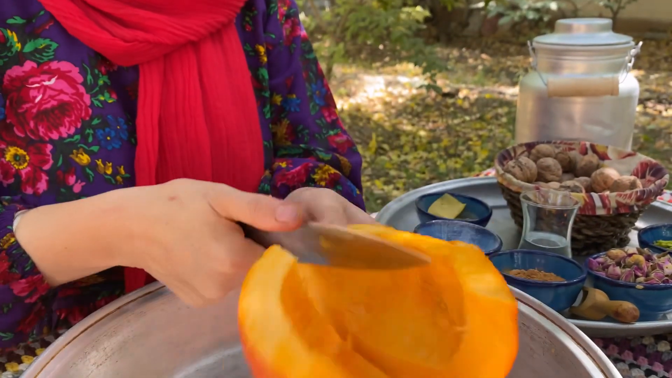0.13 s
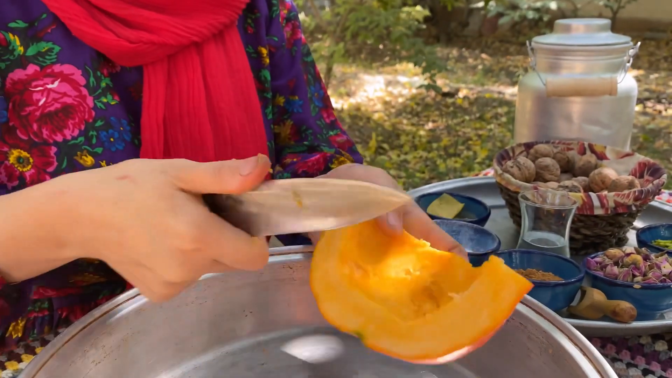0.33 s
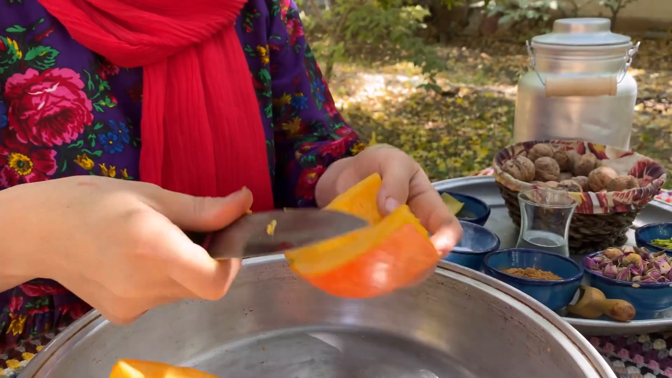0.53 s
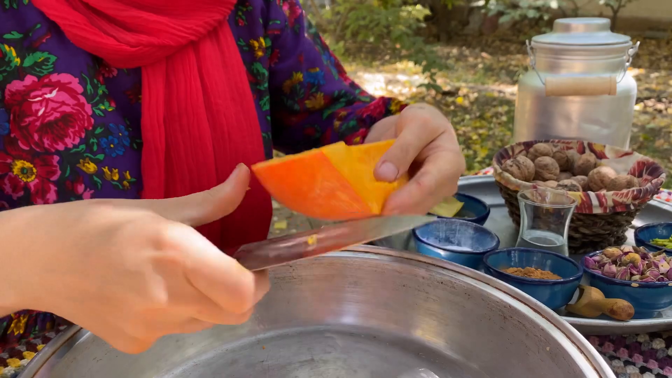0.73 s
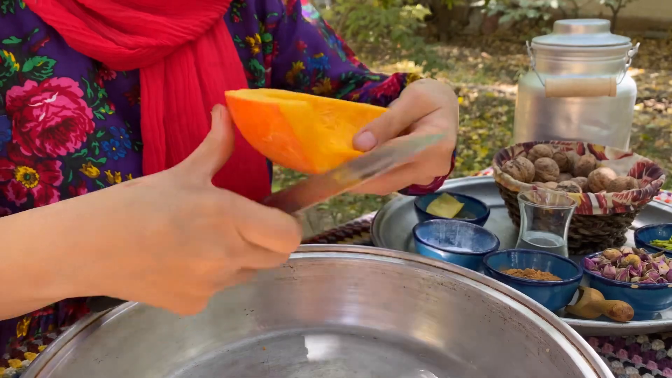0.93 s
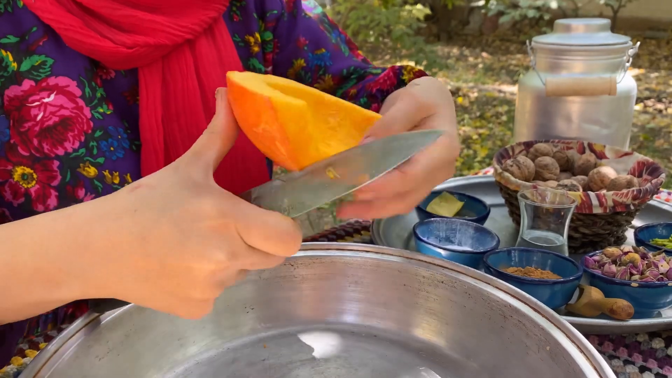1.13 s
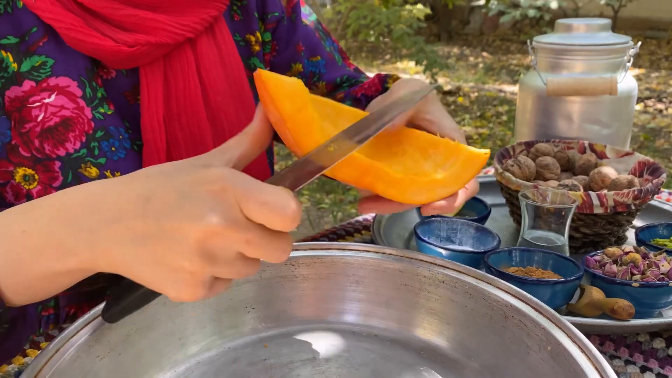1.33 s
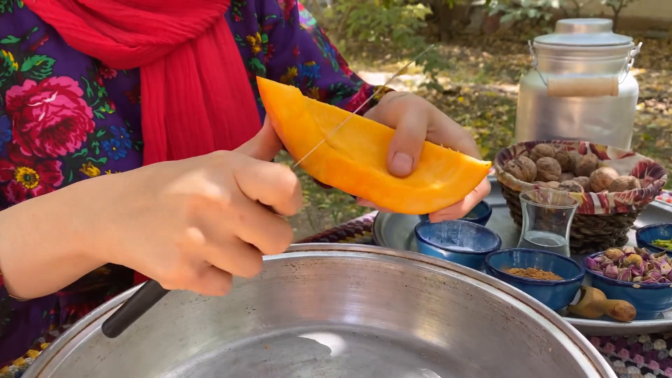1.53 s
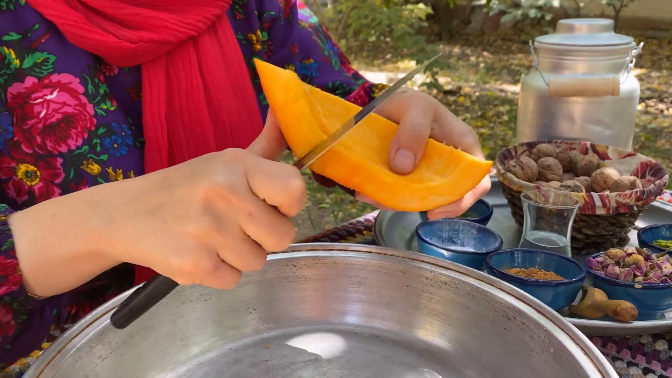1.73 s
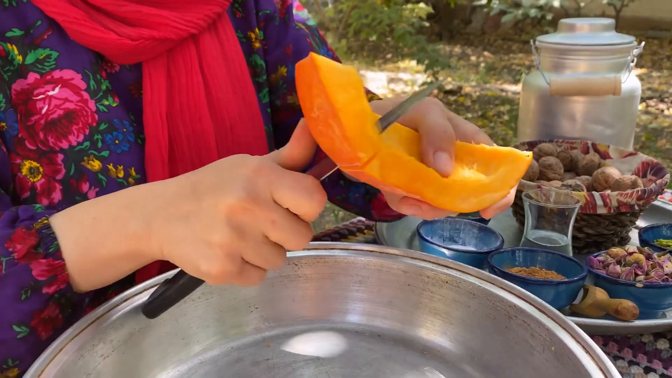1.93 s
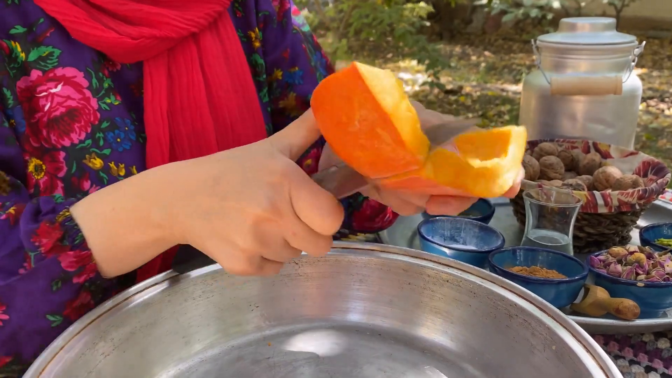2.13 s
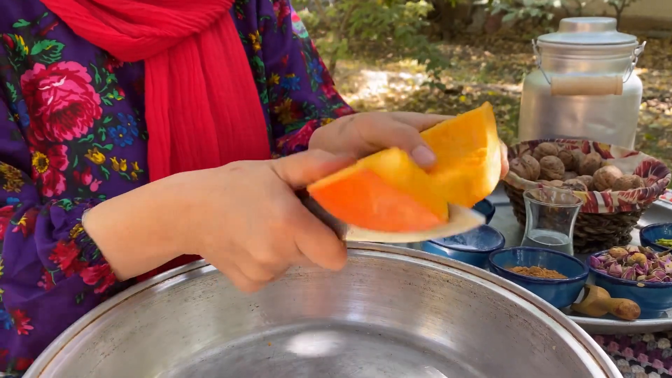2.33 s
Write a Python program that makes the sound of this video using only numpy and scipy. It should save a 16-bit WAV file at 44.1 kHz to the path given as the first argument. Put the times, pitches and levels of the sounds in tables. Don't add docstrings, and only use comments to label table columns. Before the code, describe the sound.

A knife cuts raw pumpkin, close and dry outdoors in faint wind and soft hiss. Short rasps until 0.1 s; at 0.19 s a half drops loudly into a metal basin, with low table thumps and softening knocks to 0.7. Double rim tap at 0.76-0.79, then near quiet, a tiny click at 1.48. Crisp slicing from 1.7, sharp snap 1.91, crackling break 2.04-2.07, faint last slice 2.33.

```python
import sys
import numpy as np
from scipy import signal
from scipy.fft import rfft, irfft
from scipy.io import wavfile
from scipy.ndimage import uniform_filter1d

SR = 44100
rng = np.random.default_rng(int(sys.argv[2]) if len(sys.argv) > 2 else 0)


def gain_from_db(level_db):
    decades = np.asarray(level_db, float) / 20
    return 10 ** decades


def digitize_waveform(pressure):
    field = np.atleast_2d(pressure).T
    bounded = np.clip(field, -1, 1)
    quanta = np.round(bounded * 32767).astype(np.int16)
    wavfile.write(sys.argv[1], SR, quanta)


N = 103635
SIDES = np.array([[1], [-1]])


def colour(x, points, tilt_db=0.):
    hz = np.maximum(np.fft.rfftfreq(x.shape[-1], 1 / SR), 10)
    points_hz, points_db = np.array(points, float).T
    gain_db = np.interp(np.log(hz), np.log(points_hz), points_db)
    gain_db = gain_db + tilt_db * np.log2(np.maximum(hz, 500) / 2000)
    return irfft(rfft(x) * gain_from_db(gain_db), x.shape[-1])


def unit(x):
    return x / np.sqrt(np.mean(x ** 2))


def add(out, x, at_s):
    i = int(at_s * SR)
    out[:, i:i + x.shape[1]] += x[:, :N - i]


def pan(pan_db):
    return SIDES * pan_db / 2


def walk(rate_per_s):
    k = int(SR / rate_per_s)
    steps = np.repeat(rng.standard_normal(N // k + 1), k)
    return unit(uniform_filter1d(uniform_filter1d(steps, k), k)[:N])


def garden():
    # f/Hz, density/dB per Hz
    air_spectrum = [(15, -49), (35, -7.5), (65, -6.5), (119, -10.5), (319, -17), (353, -28), (550, -28.5),
                    (1300, -34), (2300, -35.5), (4500, -40.5), (10000, -54.5), (16100, -81), (22000, -120)]
    level_db, flicker_db, flicker_per_s = -53, .8, 12
    out = 0
    for hz in 35 * 2. ** np.arange(9):
        mid, side = rng.standard_normal((2, N))
        band = [(hz / 8, -60), (hz / 2, -9), (hz, 0), (hz * 2, -9), (hz * 8, -60)]
        air = mid + min(0.51 + hz / 2500, 1) * side * SIDES
        flicker = gain_from_db(flicker_db * (-0.5 + 100 / hz) * walk(flicker_per_s))
        out = out + colour(air, band) * flicker
    return gain_from_db(level_db) * unit(colour(out, air_spectrum))


def table_shake():
    # highest crest t/s, peak level/dB, f/Hz
    thumps = [(0.221, -11.5, 79.64), (0.29, -12, 77.6), (0.349, -29.5, 75), (0.418, -29, 73.6),
              (0.475, -24.5, 72.8), (0.496, -22.5, 78.7), (.532, -34.5, 72.9), (0.587, -39, 66.7),
              (.663, -29, 83.1), (0.703, -35, 82.4), (0.77, -31, 77.5), (0.78, -24, 83),
              (0.806, -31.5, 77.4), (0.834, -34, 69.3), (.873, -38, 62.7), (0.973, -34, 73),
              (1.05, -48, 60), (1.152, -37, 74.4), (1.21, -42.5, 64.2), (1.232, -41.5, 73.5),
              (1.305, -44, 61.6), (1.322, -39.5, 60), (1.445, -51.5, 60), (1.6, -49.5, 75.7),
              (1.637, -42.5, 75.8), (1.756, -48.5, 71.3), (1.935, -43, 76.2), (1.978, -44.5, 66.24),
              (2.131, -47, 60), (2.219, -46, 55), (2.331, -48, 60)]
    sharp_s, fall_s, sag, overtone_db, pan_db = 0.011, 0.007, 0.36, -11, -4.5
    out, t = np.zeros((2, N)), np.arange(-2200, 7000) / SR
    for at_s, db, hz in thumps:
        swell = np.exp(-((t - .004) / sharp_s) ** 2 / 2)
        swell += gain_from_db(-22) * np.exp(-t / fall_s) * np.clip(t / sharp_s, 0, 1)
        phase = 2 * np.pi * hz * (t - sag * sharp_s * np.log(np.cosh(t / sharp_s)))
        early = np.exp(-((t + 0.012) / 0.0055) ** 2) * np.sin(2.22 * 2 * np.pi * hz * t)
        thump = swell * np.cos(phase) + gain_from_db(overtone_db) * early
        add(out, gain_from_db(db + pan(pan_db)) * thump, at_s + t[0])
    return out


def rasp(rows, edge_s, grit_db, ring_db, ring_hz, apart, pan_db):
    # f/Hz, density/dB per Hz
    flesh = [(180, -54), (300, -25.5), (1150, -11.5), (1530, -9), (3000, -12), (7260, -9.5), (11600, -16),
             (13500, -23), (15400, -20.5), (16500, -54)]
    crackle_per_s = 1800
    out, t = np.zeros((2, N)), np.arange(12000) / SR - edge_s
    for start_s, length_s, db, tilt_db in rows:
        mid, side, grit, mottle = rng.standard_normal((4, len(t)))
        size = gain_from_db(grit_db * unit(uniform_filter1d(grit, 1 + int(SR / crackle_per_s))))
        ripple = gain_from_db(ring_db * unit(uniform_filter1d(mottle, 1 + int(ring_hz * len(t) / SR))))
        ripple = ripple[:len(t) // 2 + 1]
        grains = irfft(ripple * rfft(size * (mid + apart * side * SIDES)))
        gate = np.clip(t / edge_s + 1, 0, 1) ** 2 * np.exp(-np.maximum(t - length_s, 0) / edge_s)
        burst = unit(colour(grains, flesh, tilt_db)) * gate
        add(out, gain_from_db(db + pan(pan_db)) * burst, max(start_s - edge_s, 0))
    return out


def hits(rows, modes, scatter_db, crack_db, crack_s, lag_s, pan_db):
    wander_rad = .0025
    crack_spectrum = [(250, -21.5), (550, 2), (900, 1), (7500, -22.5), (9000, -33.5), (13000, -72)]
    out, t = np.zeros((2, N)), np.arange(13000) / SR
    hz, mode_db, t60_s = (c[:, None] for c in np.array(modes).T)
    for at_s, db, tilt_db, contact_s in rows:
        level_luck, pan_luck = rng.standard_normal((2, len(hz), 1))
        noise = rng.standard_normal((2, len(t)))
        steps = rng.standard_normal((len(hz), len(t)))
        wander = wander_rad * np.sqrt(hz / 100) * np.cumsum(steps, axis=1)
        ring_db = mode_db + tilt_db * np.log2(hz / 1000) + scatter_db * level_luck
        ring = gain_from_db(ring_db) * np.exp(-np.log(1000) * t / np.clip(t60_s, .01, .3))
        body = []
        for side in (1, -1):
            gain = gain_from_db(side * (1.1 * pan_luck + pan_db / 2))
            wave = np.sin(2 * np.pi * hz * (t - side * lag_s / 2) + wander)
            body.append((ring * gain * wave).sum(0))
        body = np.array(body) * (1 - np.exp(-(t / max(contact_s, 1e-4)) ** 2))
        crack = unit(colour(noise * 0.61 + noise[1], crack_spectrum, tilt_db))
        crack = crack * np.clip(t / 0.0005, 0, 1) ** 2 * np.exp(-t / crack_s)
        add(out, gain_from_db(db) * (body / np.abs(body).max() + gain_from_db(crack_db) * crack), at_s)
    return out


def basin_booms():
    # t/s, peak level/dB, brightness/dB per octave, contact/s
    booms = [
        (.19, -16.5, 0, 0.0055),
        (.275, -23, 0.0059, .008),
        (.47, -28, 0.023, 0.013),
        (.755, -26.5, 0.0047, 0.0071),
        (.79, -26.5, 0, 0.0066),
    ]
    # f/Hz, level/dB, t60/s
    belly = [(144, 0, 0.0786), (172.2, -2, .1)]
    return hits(booms, belly, 0, crack_db=-59.5, crack_s=0.0041, lag_s=0, pan_db=-3.0)


def nail_clicks():
    # t/s, peak level/dB, brightness/dB per octave, contact/s
    clicks = [
        (.415, -46.5, 0.011, 0.0031),
        (1.394, -49, 0.0023, .003),
        (1.476, -37, 0, 0.0007),
    ]
    # f/Hz, level/dB, t60/s
    nail = [(2320, -6, 0.016), (2405, -6, 0.026), (3260, -3.5, 0.0094)]
    return hits(clicks, nail, scatter_db=-3.0, crack_db=-30.5, crack_s=0.0035, lag_s=.0001, pan_db=-2.0)


def rind_slides():
    # start t/s, length/s, level/dB, brightness/dB per octave
    slides = [
        (.35, 0.099, -52, -3.5),
        (.752, 0.062, -57, -6.5),
        (.83, 0.028, -55, -10),
        (.95, 0.23, -64.5, -8.5),
        (2.015, 0.049, -44, -8.5),
        (1.57, 0.14, -68, -5),
    ]
    return rasp(slides, edge_s=0.026, grit_db=5.0, ring_db=7.0, ring_hz=60, apart=0.74, pan_db=0.0)


def fibre_ticks():
    # start t/s, length/s, level/dB, brightness/dB per octave
    ticks = [(.307, 0.0081, -43, -8), (1.281, 0.0054, -54.5, -6), (1.298, .004, -52.5, -9),
             (1.395, 0.02, -61.5, -6), (1.476, 0.0028, -55.5, -3.5), (1.8912, .001, -42.5, -4.5),
             (1.948, 0.0012, -37.5, -1)]
    return rasp(ticks, edge_s=.0015, grit_db=0, ring_db=3, ring_hz=400, apart=.7, pan_db=0)


def half_lands():
    # t/s, peak level/dB, brightness/dB per octave, contact/s
    landing = [
        (.1863, -1, 0, .0022),
        (.2015, -18, 1, .003),
    ]
    # f/Hz, level/dB, t60/s
    shell = [(648, -4, .052), (705, -19, .085), (855, 0, .032), (960, -3, .028), (1097, -9, .1),
             (1357, -29, .13), (1500, -16, .04), (1727, -27, .11), (2150, -25, .05), (2815, -28, .07),
             (3020, -30, .09), (5600, -31, .03), (4495, -33, .055), (6990, -30, .04)]
    return hits(landing, shell, 0, crack_db=-21, crack_s=0.01, lag_s=.00006, pan_db=1)


def half_rocks():
    # t/s, peak level/dB, brightness/dB per octave, contact/s
    rocks = [(0.269, -19.5, -0.5, 0.0018), (.281, -32.5, -9, 0.0017), (.297, -35.5, 3.5, .003),
             (0.395, -35, -3, 0.00185), (0.456, -35, -3.3, 0.001), (0.478, -28.5, -4, 0.00062),
             (0.644, -33, -8.5, 0.0021), (0.683, -41, -4, 0.00094), (0.84, -40.5, -6, 0.0035),
             (0.955, -45, -8, 0.00067), (1.188, -44.5, -4.5, 0.0015)]
    # f/Hz, level/dB, t60/s
    hollow = [(473, 0, .04), (700, -4, .05), (820, -11, .11), (860, -3, .04), (1097, -13, .12),
              (1351, -16, .12), (1491, -19, .1), (1727, -21, .1), (2230, -19, .08), (2500, -22, .06),
              (3042, -24, .09)]
    return hits(rocks, hollow, scatter_db=2.5, crack_db=-14.5, crack_s=0.013, lag_s=.0001, pan_db=-0.5)


def rim_taps():
    # t/s, peak level/dB, brightness/dB per octave, contact/s
    taps = [
        (.7645, -15.5, 2, 0.0029),
        (.787, -13, 2, 0.0011),
        (.81, -40, 3, 0.0018),
        (.862, -41, 7.5, 0.0077),
        (.875, -48.5, -9, 0.002),
    ]
    # f/Hz, level/dB, t60/s
    rim = [(468, 3, .05), (755, -7, .05), (1110, -3, .13), (1453, -14, .1), (1795, -15, .08),
           (2190, -4, .05), (2235, -2, .08), (2503, -11, .11), (2995, -11, .1), (3607, -8, .06),
           (4200, -5, .055), (4300, -9, .035), (4900, -11, .05), (7391, -30, .063)]
    return hits(taps, rim, scatter_db=1, crack_db=-19.5, crack_s=0.01, lag_s=.0001, pan_db=-5.0)


def blade_rubs():
    # t/s, peak level/dB, brightness/dB per octave, contact/s
    rubs = [
        (2.0, -52, 9, .006),
        (2.012, -52, 3.5, 0.0072),
        (2.024, -40, -10, .004),
        (2.033, -25.5, -2, 0.0024),
    ]
    # f/Hz, level/dB, t60/s
    blade = [(700, -3, .04), (1097, -3, .05), (1300, -5, .04), (1600, -2, .06), (2500, -11, .04),
             (3200, -10, .04), (5300, -18, .03)]
    return hits(rubs, blade, scatter_db=2, crack_db=-18, crack_s=.01, lag_s=-.0002, pan_db=0.5)


def flesh_snaps():
    # t/s, peak level/dB, brightness/dB per octave, contact/s
    snap = [
        (1.9115, -9.5, 0, .0015),
    ]
    # f/Hz, level/dB, t60/s
    wedge = [(445, -12, .05), (525, -17, .08), (700, -14, .04), (972, 0, .045), (1217, -3, .045),
             (1475, -3, .045), (1733, -14, .08), (2020, -10, .06), (2604, -14, .08), (2850, -16, .055)]
    return hits(snap, wedge, 0, crack_db=-13.0, crack_s=0.008, lag_s=-0.000097, pan_db=-0.5)


def piece_breaks():
    # t/s, peak level/dB, brightness/dB per octave, contact/s
    breaks = [
        (2.0412, -18, 0, .0015),
        (2.0478, -21, 1, .0015),
        (2.0566, -8.5, 1, .001),
        (2.066, -17, -1, .002),
    ]
    # f/Hz, level/dB, t60/s
    piece = [(446, -10, .07), (540, -11, .05), (665, -1, .045), (950, -15, .14), (1097, -6, .105),
             (1280, -10, .07), (1450, -11, .06), (1600, -10, .04), (1725, -18, .1), (5150, -23, .025),
             (2550, -23, .09), (2985, -16, .065), (4202, -26, .07), (5324, -32, .12)]
    return hits(breaks, piece, scatter_db=1.5, crack_db=-15, crack_s=0.0075, lag_s=-0.00023, pan_db=0.0)


def blade_slices():
    # start t/s, length/s, level/dB, brightness/dB per octave
    slices = [(.023, 0.0063, -40.5, -5.5), (.028, 0.012, -41.5, -1.5), (.06, 0.017, -32.5, -3),
              (.082, 0.01, -40.5, -4.5), (1.708, 0.018, -57, -1), (1.753, 0.0085, -43.5, 0.5),
              (1.762, 0.0096, -48.5, -3.5), (1.796, 0.0059, -42.5, 2.5), (1.802, 0.0057, -40.5, -0.5),
              (1.8145, 0.0024, -45, -3), (1.829, 0.016, -43, 0.7), (1.845, 0.019, -40, -0.4),
              (1.872, 0.0042, -41, 0.5), (1.882, 0.013, -40.5, 0), (1.9, 0.0097, -48.5, -1),
              (2.326, 0.011, -47, 0)]
    return rasp(slices, edge_s=0.0022, grit_db=1, ring_db=3.5, ring_hz=102.5, apart=0.79, pan_db=1.0)


def yard(near):
    t60_s, level_db = .16, -18
    t = np.arange(15000) / SR
    tail = rng.standard_normal((2, len(t))) * np.exp(-np.log(1000) * t / t60_s)
    tail = tail / np.sqrt((tail ** 2).sum(1, keepdims=True))
    return signal.fftconvolve(near, gain_from_db(level_db) * tail, axes=1)[:, :N]


def scene():
    near = basin_booms() + nail_clicks() + rind_slides() + fibre_ticks()
    near = near + half_lands() + half_rocks() + rim_taps()
    near = near + blade_rubs() + flesh_snaps() + piece_breaks() + blade_slices()
    return garden() + table_shake() + yard(near) + near


def top_cut(x):
    return signal.sosfilt(signal.butter(12, 16780, fs=SR, output="sos"), x)


def record(dry):
    # f/Hz, gain/dB
    ports = [(25, -19.5), (55, 2.5), (8100, -1), (8700, -14), (9500, -12.5), (10000, 2), (12200, -0.5),
             (13200, -15)]
    mid = colour(dry[0] + dry[1], ports + [(14300, 0)]) / 2
    side = (dry[0] - dry[1]) / 2
    low_pass = signal.ellip(8, .2, 60, 15800, fs=SR, output="sos")
    wet = signal.sosfilt(low_pass, np.array([mid + side, mid - side]))
    return top_cut(wet)


dry = scene()
out = record(dry)
digitize_waveform(out)
```